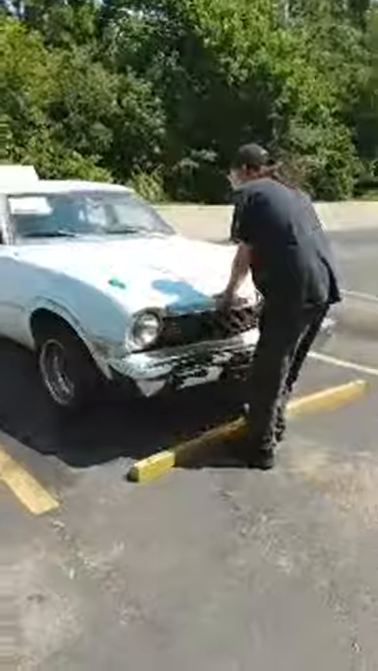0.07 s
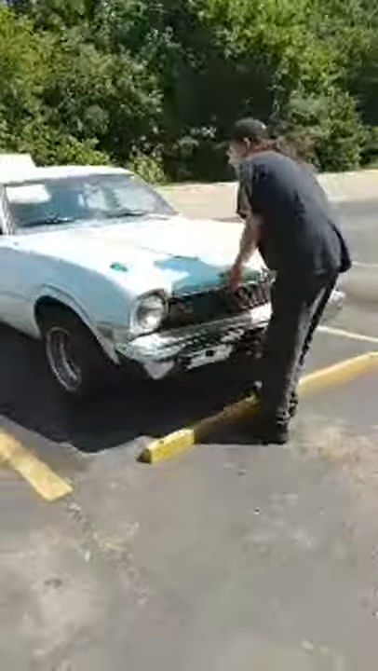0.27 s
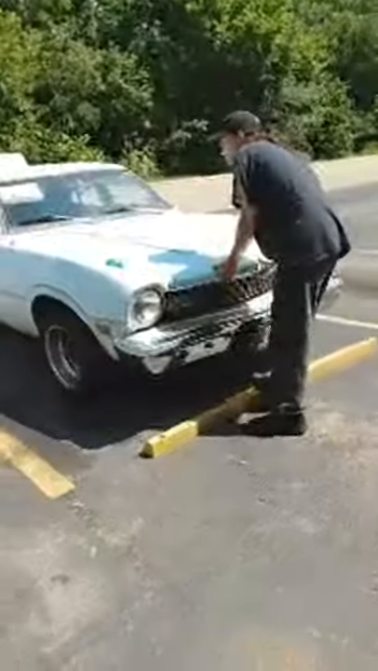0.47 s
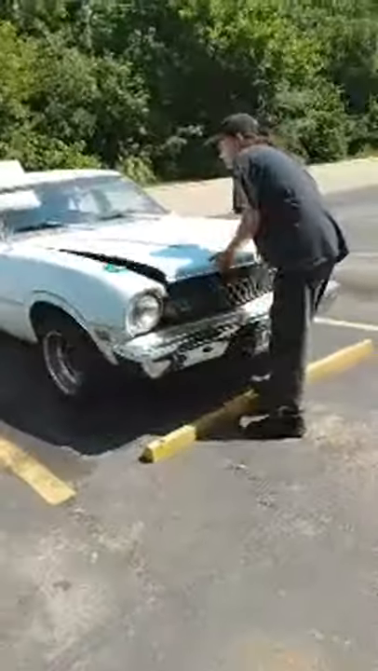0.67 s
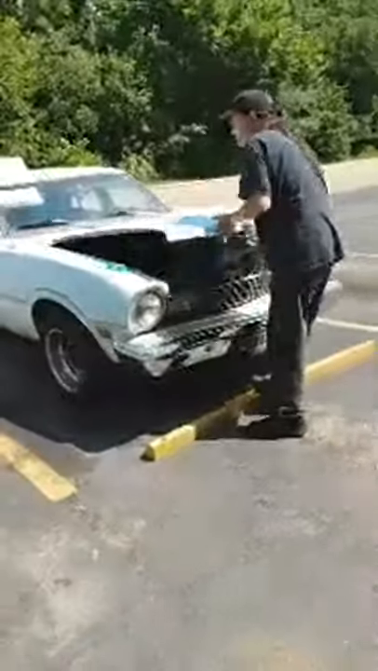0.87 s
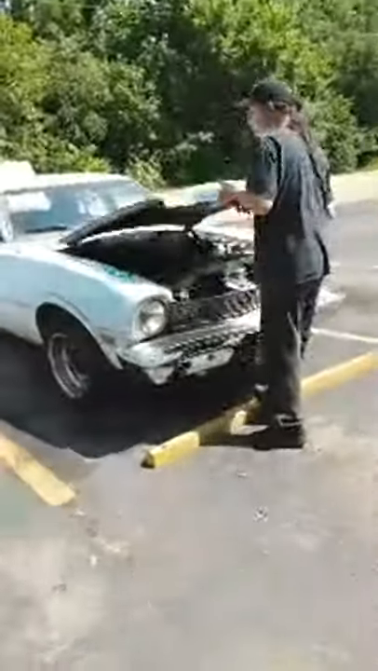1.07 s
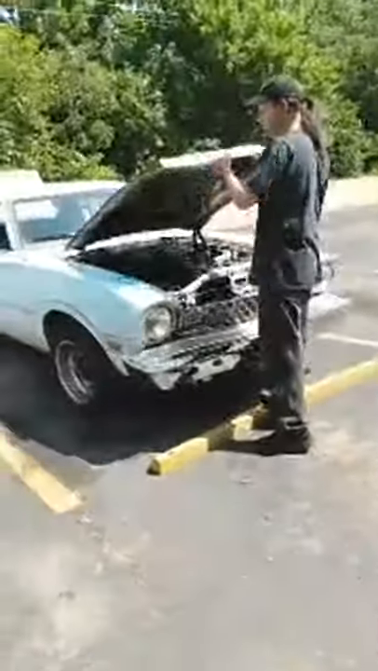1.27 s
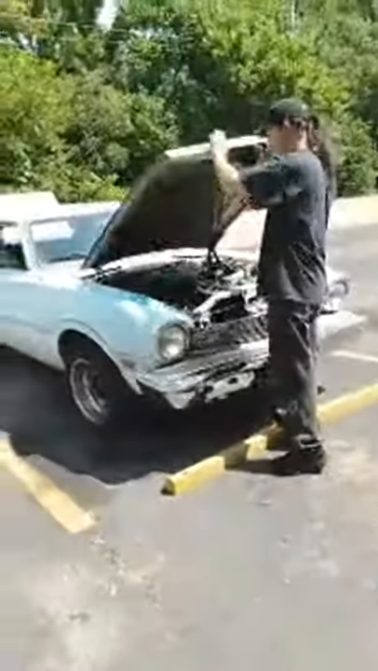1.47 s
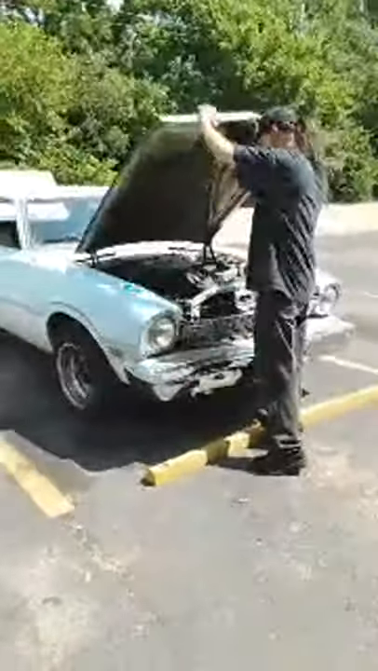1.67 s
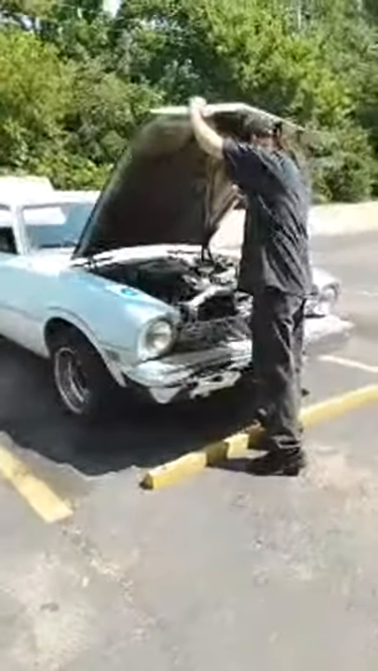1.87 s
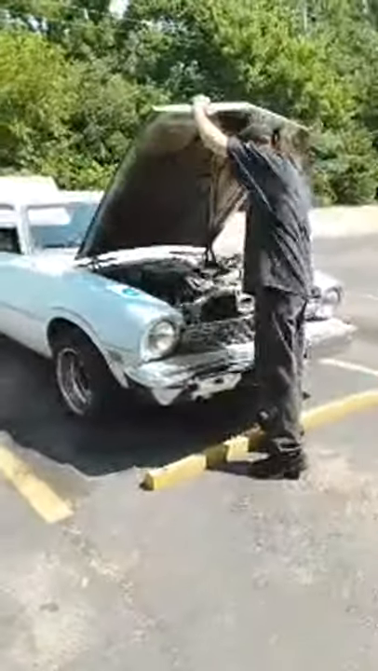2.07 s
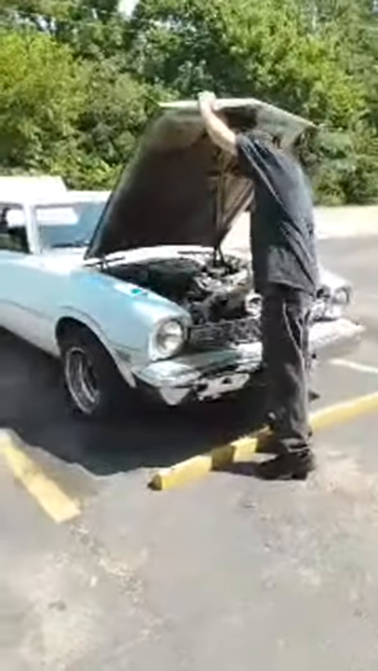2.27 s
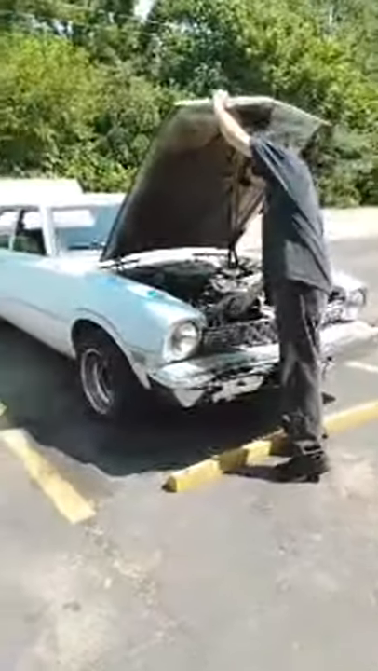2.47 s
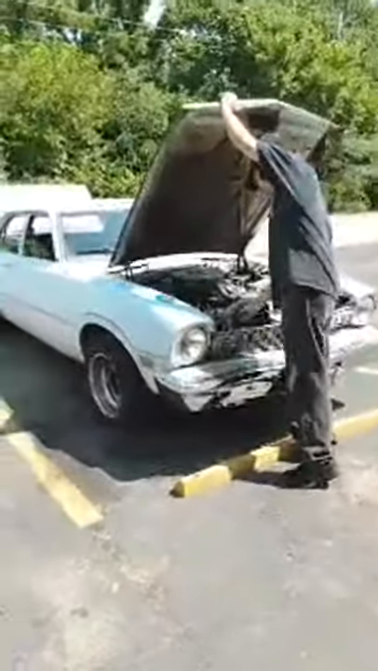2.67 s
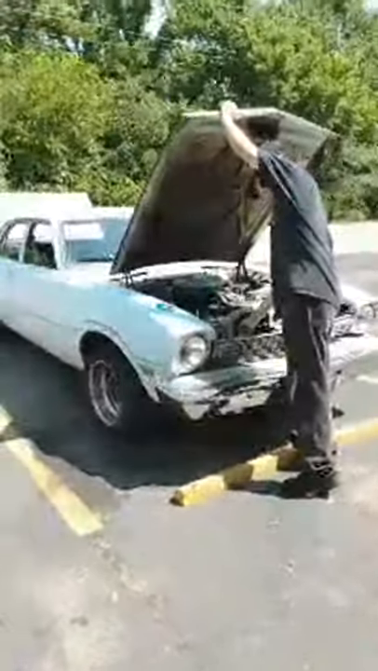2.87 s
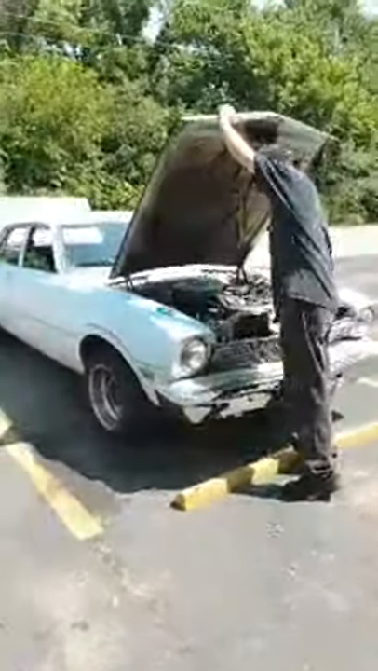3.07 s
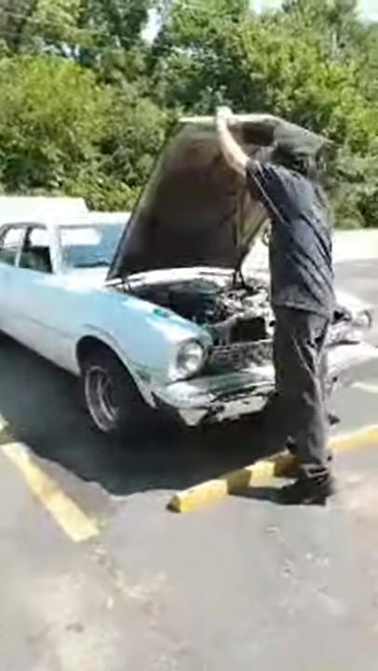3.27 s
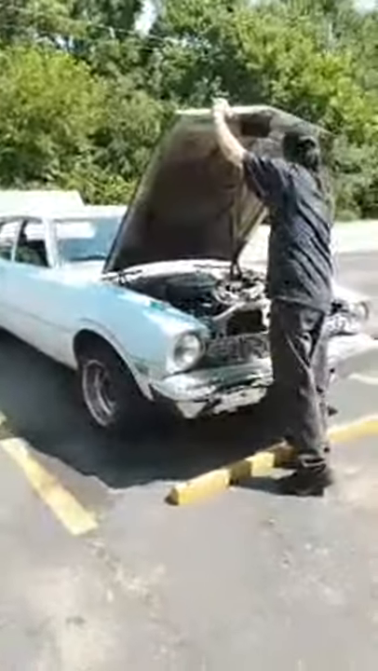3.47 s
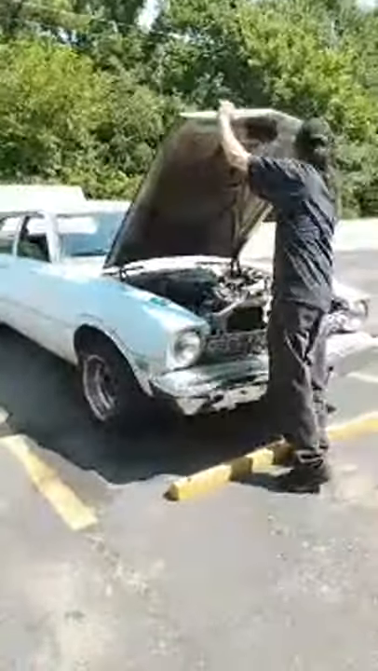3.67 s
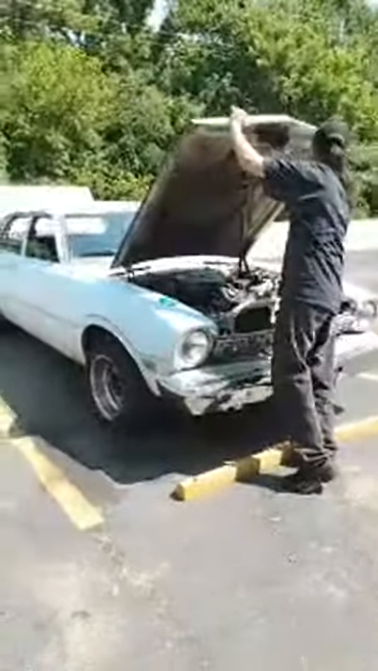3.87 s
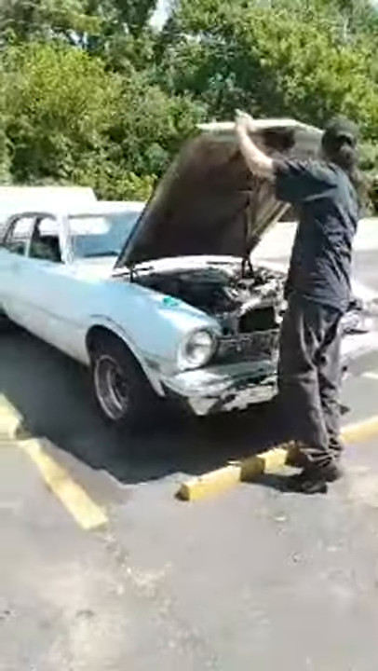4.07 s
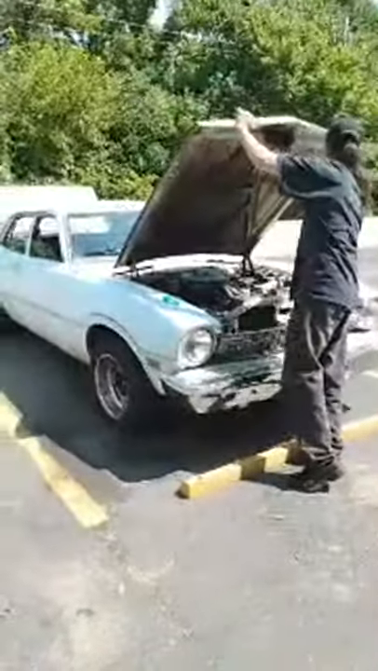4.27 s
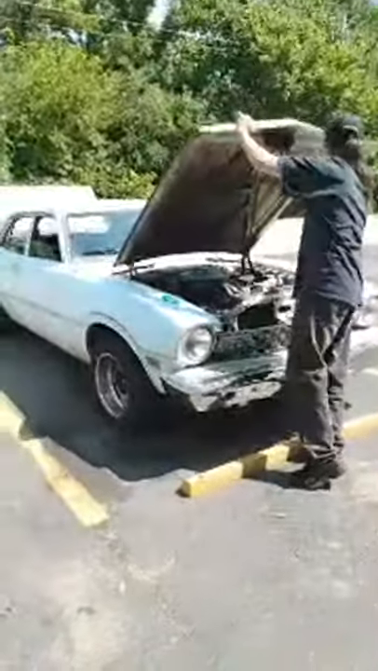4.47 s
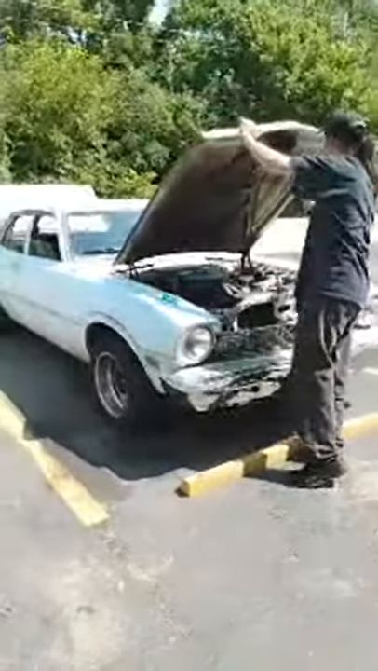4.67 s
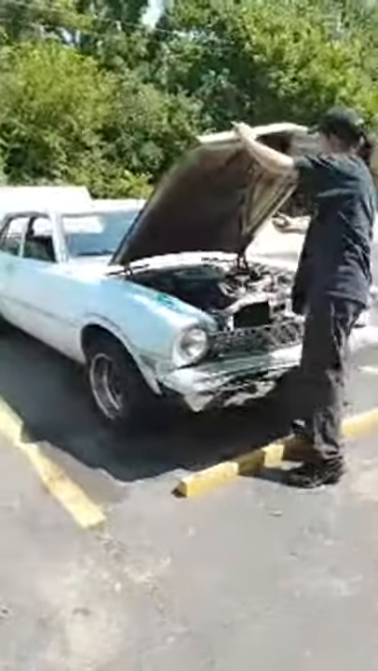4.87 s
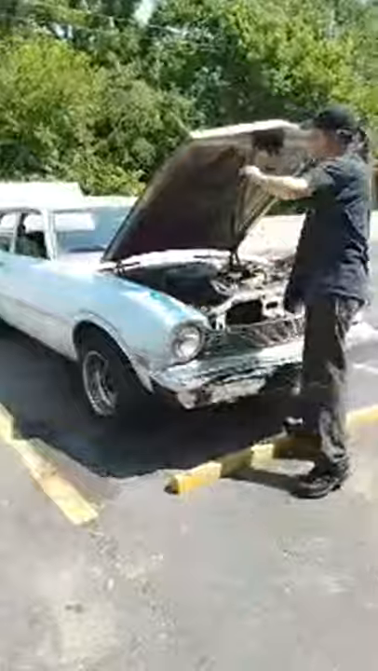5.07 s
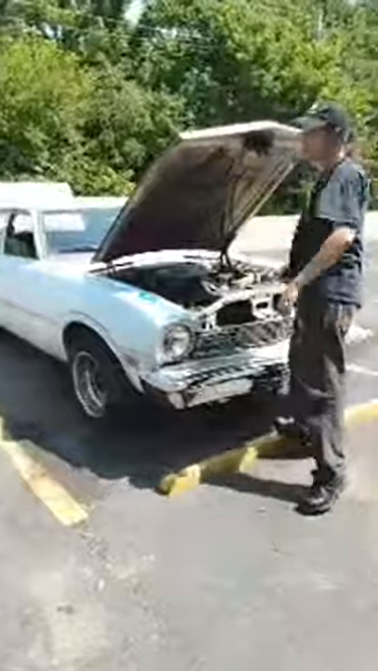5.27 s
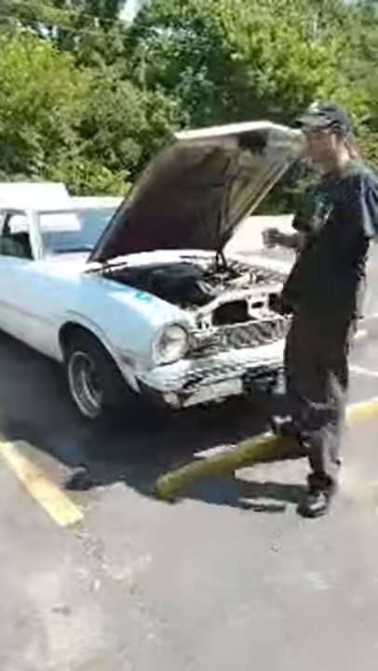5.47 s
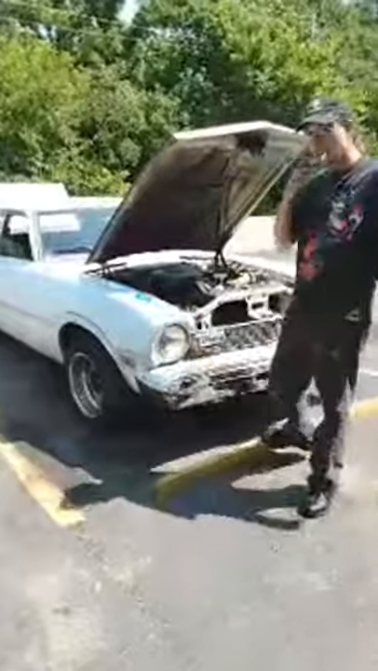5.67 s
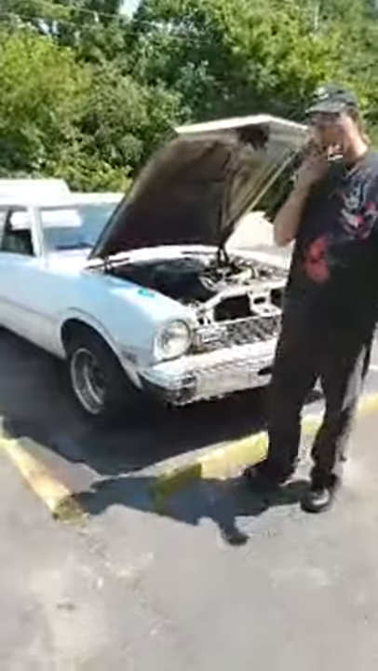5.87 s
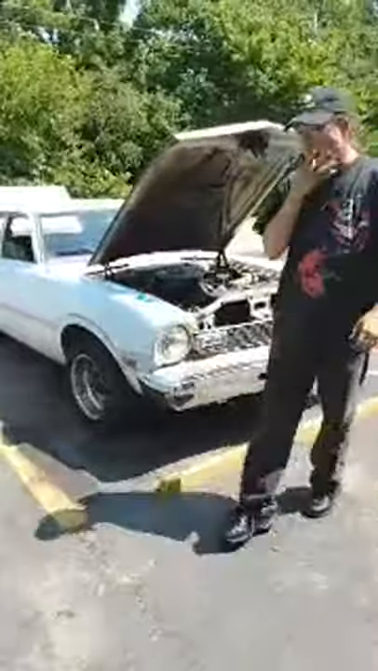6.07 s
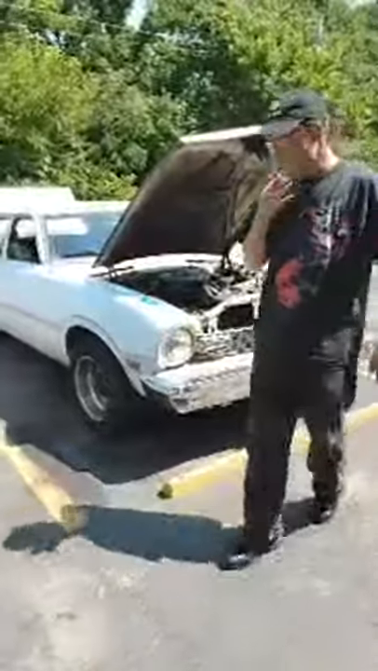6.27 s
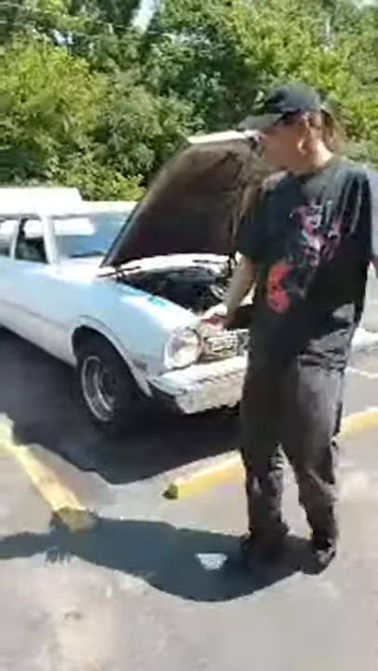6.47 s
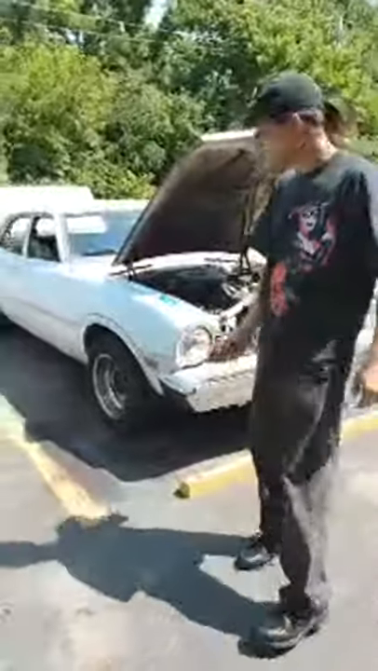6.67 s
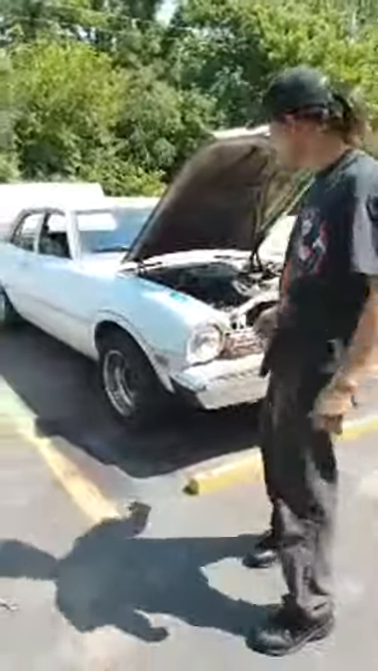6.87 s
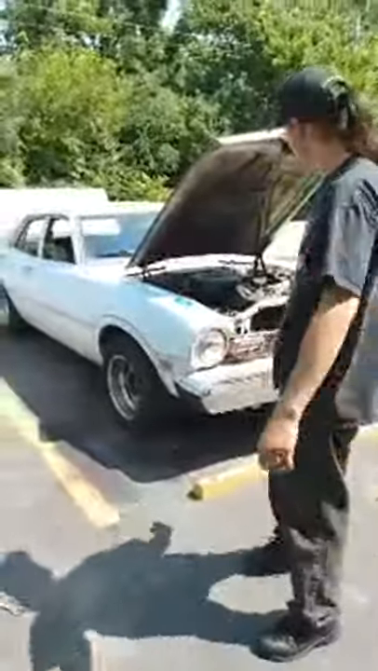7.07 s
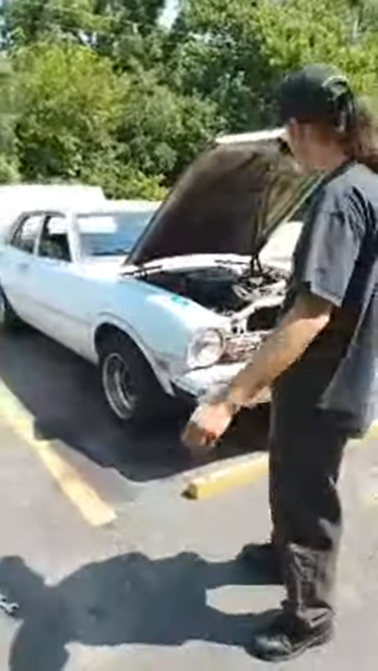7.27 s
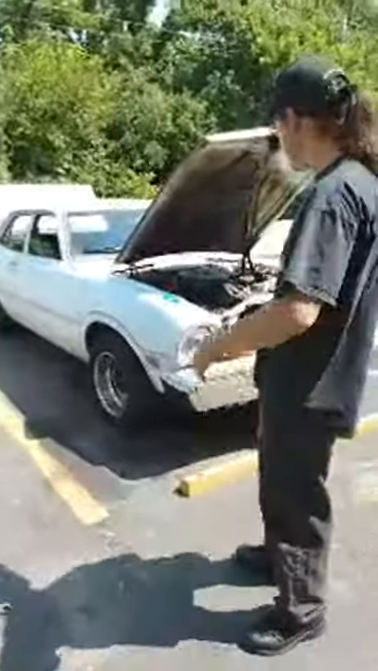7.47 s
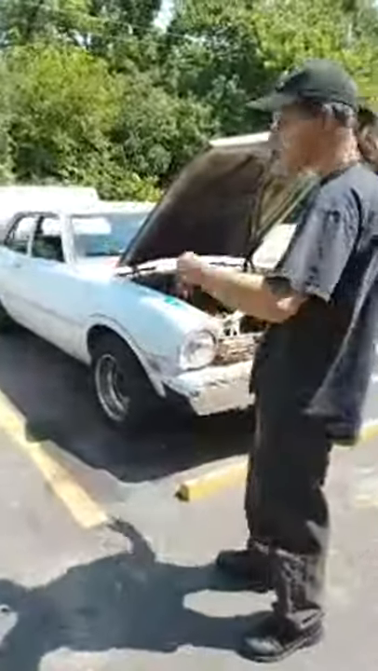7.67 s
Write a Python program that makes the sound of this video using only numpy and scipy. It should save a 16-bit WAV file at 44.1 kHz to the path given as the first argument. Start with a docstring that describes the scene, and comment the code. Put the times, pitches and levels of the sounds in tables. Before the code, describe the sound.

Outdoors in a quiet parking lot, a phone microphone a few metres away catches a car hood being opened. Small taps lead to a bright latch snap and a loud hollow clunk, a brief low hinge creak, then a pause. Rod clatter and knocks follow in clusters, ending with dull panel thumps. Quiet shoe scuffs on asphalt finish over faint, thin cicada buzz.

```python
"""Latch snaps and a deep clunk open the scene: a steel car hood is unlatched, lifted and propped in a quiet lot.
The hinge creaks, the rod knocks, and footsteps on asphalt gather towards the end; cicadas buzz in far trees.
Steel is ringing modes plus decaying noise bands, with wavering drones; the creak is stick-slip pulses through a body.
Shoes are coloured noise bursts; deep rumble, air puffs, hums, a brief hiss and a low floor are shaped noise.
A phone microphone listens."""
import sys
import numpy as np
from scipy import signal
from scipy.fft import rfft, irfft, next_fast_len
from scipy.io import wavfile
from scipy.ndimage import uniform_filter1d, map_coordinates

SR = 44100
rng = np.random.default_rng(int(sys.argv[2]) if len(sys.argv) > 2 else 0)


def linear_from_db(decibels):
    """Turn decibels (scalar or array-like) into linear amplitude factors; 0 gives 1."""
    return 10 ** (np.asarray(decibels, float) / 20)


def master_out(mix):
    """Clip the mix to full scale and print it as 16-bit PCM to the path in sys.argv[1]."""
    frames = np.transpose(np.atleast_2d(mix))
    ceiling = np.clip(frames, -1, 1)
    pcm = np.round(ceiling * 32767).astype(np.int16)
    wavfile.write(sys.argv[1], SR, pcm)


N = 340893  # length in samples

# All table levels are relative; sources add their own colour and random variation.
# Steel contacts: start_s, clank_db, boom_db, snap_db, pitch_hz (of the struck spot)
STEEL_CONTACTS = [(.004, -51, -53, -51, 433), (.04, -64.5, -56, -62, 1895), (.414, -40, -46, -69, 344),
                  (.44, -51, -50, -67.5, 463), (.535, -32, -40.5, -38.5, 230.7),
                  (.67, -49, -36, -47, 228.3), (0.679, -22.5, -32.5, -19.5, 3876),
                  (.795, -39.5, -33, -29, 5480), (.82, -33.5, -43, -28, 425),
                  (.888, -35.5, -27.5, -42, 219), (.942, -10, -12, -25.5, 461),
                  (1.052, -35.5, -24, -30, 370), (1.16, -44.5, -32, -46.5, 234),
                  (1.336, -48, -48, -62.5, 107), (1.408, -46.5, -44, -60.5, 325),
                  (1.5, -62, -47, -59.5, 107), (1.619, -48.5, -61.5, -75, 107),
                  (2.448, -39, -68, -75.5, 900), (2.463, -36.5, -57, -60.5, 425),
                  (2.484, -46.5, -66.5, -70, 1243), (2.521, -62, -50, -73, 348),
                  (2.587, -80, -66, -87, 224), (2.713, -37, -42.5, -62.5, 275),
                  (2.735, -27.5, -48, -32, 316), (2.831, -48.5, -38, -53, 900),
                  (2.847, -29.5, -36.5, -25, 252), (2.888, -26.5, -29, -19, 289),
                  (2.98, -21, -31.5, -19.5, 1692), (3.019, -47.5, -45.5, -45.5, 286),
                  (3.096, -51.5, -70.5, -43, 1380), (3.185, -55.5, -57, -38.5, 425),
                  (3.273, -46, -49, -26, 3860), (3.289, -57, -53, -47, 1068), (3.421, -54, -62, -49, 874),
                  (3.532, -42.5, -67.5, -28.5, 425), (3.573, -48, -85, -42, 1138),
                  (3.66, -54, -104, -58, 1100), (3.972, -45.5, -76, -39.5, 1150),
                  (3.982, -54, -89, -40, 1895), (4.107, -33, -34.5, -38, 391.7),
                  (4.358, -35.5, -47.5, -43, 2450), (4.462, -37.5, -51, -52, 370),
                  (4.506, -24.5, -31.5, -35, 333), (4.522, -29, -42, -35.5, 453),
                  (4.547, -57, -33.5, -50, 2450), (4.603, -39.5, -51, -44, 375),
                  (4.798, -31.5, -25, -50, 435), (4.93, -44.5, -35.5, -48.5, 268),
                  (5.048, -68, -44.5, -67, 237)]
# Centres of the steel zones clank, boom, ring, snap: centre_hz
STEEL_ZONES = [1300, 350, 4000, 11000]
# Strongest modes of the hood panel and its rod: mode_hz, level_db, t60_s
PANEL_MODES = [(107, -12, 1.3), (158.3, -9.5, 0.74), (163.4, -16, 1.5), (223, -1, 0.67), (252, -6.5, 0.58),
               (302, -6.5, 1), (325, -6, 0.51), (370, -4.5, 1), (425, 1.5, 0.35), (471.4, -8.5, 0.64),
               (555.8, -9.5, 0.93), (600, -2.5, 0.47), (690, -3, 0.32), (838, -9, 0.1), (900, -12, 0.25),
               (980, -7, 0.35), (1068, -3, .32), (1150, -1, 0.14), (1177, -15, 0.59), (1315.7, -14.5, .4),
               (1340, -12.5, 0.15), (1692, -4.5, 0.25), (1895, -6.5, .3), (2090, -12, 0.21),
               (2450, -6.5, 0.28), (3860, -9.5, 0.043), (5480, -1.5, 0.16), (8980, 0, 0.26),
               (9500, -5, 0.1567)]
# Dense field of small plate modes: band_hz, colour_db, early_t60_s, late_t60_s, late_db (t60s at length factor 1)
PLATE_FIELD = [(126.5, -18.5, 0.2, 1, -7.5), (235.3, -11, 0.26, 0.88, -12.5), (355, -8, 0.33, 0.69, -14),
               (556, -12.5, 0.33, 0.2, -6.5), (1080, -13.5, 0.37, 0.057, -9), (1712, -9, 0.16, 0.44, -10.5),
               (2830, -12, 0.15, 0.56, -15.5), (4627, -4, 0.11, 0.28, -16.5), (7080, -17, 0.18, 0.17, -6.5),
               (10100, -4.5, 0.11, .5, -17), (13800, 2, 0.021, 0.35, -15)]
# Single modes that drone on, wavering, until a hand or the rod damps them: start_s, length_s, mode_hz, level_db, t60_s
PANEL_DRONES = [(.95, 1.48, 107, -47.5, 4.8), (1.864, 0.32, 336, -68, 1), (2.98, .95, 107, -59.5, 6.7),
                (3.06, .13, 1380, -50, .8), (3.256, .08, 3860, -44, .4), (4.55, 0.71, 99.2, -51, 5.2),
                (4.807, 1.02, 327.5, -51, 2.3)]
# Hinge stick-slip over time: time_s, slips_per_s, level_db
HINGE_SLIPS = [(1.478, 52, -48), (1.517, 57, -35), (1.535, 120, -32.5), (1.555, 154, -28.5),
               (1.575, 193, -24), (1.59, 191, -32.5), (1.605, 90, -29.5), (1.625, 28, -32.5),
               (1.69, 38, -53)]
# Hinge body resonances: centre_hz, width_hz, level_db
HINGE_BODY = [(251, 68, 3.5), (490, 420, 1), (745, 650, -1.5), (1720, 1000, -57)]
# Shoes on asphalt: start_s, clap_db, thud_db, scuff_db, grit_db, length_factor
FOOTSTEPS = [(2.05, -68.5, -42, -98, -101, 0.23), (5.593, -89, -93.5, -68.5, -81, 0.75),
             (5.77, -101, -66.5, -91, -59, 0.95), (6.245, -86, -69, -70, -82, 0.93),
             (6.304, -58.5, -62, -55, -69, 0.87), (6.45, -90, -87, -88, -63, 0.88),
             (6.878, -48, -38.5, -75, -74, 0.41), (6.93, -58, -60, -88.5, -68, 0.82),
             (7.02, -51, -86, -77, -86, 0.56), (7.04, -90, -99, -65, -56, 3.2),
             (7.51, -76, -90.5, -81, -95, 1.02)]
# Centres of the shoe zones clap, thud, scuff, grit: centre_hz
SHOE_ZONES = [900, 350, 1900, 10500]
# Colour of a rubber sole: frequency_hz, gain_db
SOLE_COLOUR = [(600, 1.5), (780, -3), (900, 3.5), (1050, -1), (1350, -14), (1700, -12), (1880, 8),
               (2080, -5), (5000, 3.5)]
# Colour of the panel's deep wobble: frequency_hz, level_db_per_hz
WOBBLE_COLOUR = [(15, -47.5), (25, -23), (50, -19), (86, 4.5), (161, 0.5), (194, -21.5), (220, -28.5),
                 (290, -54.5), (480, -120)]
# Puffs of air on the microphone: middle_s, spread_s (either side), level_db
AIR_PUFFS = [(0.073, 0.091, -51), (0.357, 0.12, -69.5), (1.094, 0.2, -48), (1.583, .08, -51.5),
             (4.222, 0.11, -41.5), (4.863, 0.051, -36.5), (5.195, 0.055, -59), (5.77, .06, -63),
             (6.337, 0.083, -52), (6.68, 0.23, -67.5), (7.001, 0.14, -70.5), (7.676, 0.12, -74)]
# Colour of the moving air: frequency_hz, level_db_per_hz
AIR_COLOUR = [(15, -56), (30, -27), (45, -11.5), (65, -3.5), (90, -3.5), (130, -10.5), (190, -26),
              (300, -60), (480, -120)]
# Cicada loudness over time: time_s, level_db
CICADA_LEVEL = [(0, -70.5), (.5, -107), (1.2, -63), (1.68, -68), (2.28, -68), (2.7, -60), (3.66, -61),
                (4.6, -55), (5.25, -59.5), (6.8, -60), (7.73, -64)]
# Colour of the cicada chorus: frequency_hz, level_db_per_hz
CICADA_COLOUR = [(1120, -58.5), (1900, -29.5), (2300, -36), (2370, -25.5), (2780, -1.5), (3010, -6),
                 (3900, -2), (4650, -7.5), (6020, 1), (6650, -6.5), (7750, -34), (8830, -22), (9310, -20),
                 (10100, -36), (11800, -28), (15300, -52.5), (22000, -120)]
# Faint flickering hums, perhaps single insects: centre_hz, spread_hz (either side), level_db
INSECT_HUMS = [(2440, 170, -85), (8300, 64, -89), (9100, 70, -88.5)]
# Colour of distant traffic and microphone noise: frequency_hz, level_db_per_hz
FLOOR_COLOUR = [(60, -9.5), (300, 12), (600, -0.5), (2000, 0), (16000, -4)]

TIME_S = np.arange(N) / SR


def unit(x):
    """Scales a signal to rms 1."""
    return x / np.sqrt(np.mean(x ** 2, axis=-1, keepdims=True) + 1e-20)


def along(points, hz):
    """Reads (Hz, value) points on a log frequency axis."""
    f, v = np.transpose(sorted(points))
    return np.interp(np.log(hz + 1), np.log(f + 1), v)


def curves(rows):
    """Draws one value per sample for each column after the time."""
    s, *columns = np.transpose(rows)
    return [np.interp(TIME_S, s, column) for column in columns]


def wobble(rate):
    """Draws a smooth random curve with rate knots a second."""
    knots = rng.standard_normal(int(N * rate / SR) + 4)
    return map_coordinates(knots, [np.arange(N) * rate / SR])


def filtered(x, response):
    """Multiplies the spectrum of x by a complex response of frequency."""
    m = next_fast_len(N + SR // 2)
    return irfft(rfft(x, m) * response(np.fft.rfftfreq(m, 1 / SR)), m)[..., :N]


def coloured(x, points):
    """Filters x with a gain curve of (Hz, dB) points."""
    return filtered(x, lambda hz: linear_from_db(along(points, hz)))


def gate(start_s, end_s, fade_s):
    """Opens between two times with straight fades inside them."""
    return np.clip(np.minimum(TIME_S - start_s, end_s - TIME_S) / fade_s, 0, 1)


def patchy(spectrum, patchy_db):
    """Coloured noise of rms 1 whose time-frequency patches have random gain."""
    z = signal.stft(rng.standard_normal(N + 512), nperseg=256)[2]
    field = uniform_filter1d(rng.standard_normal(z.shape), 3, 0)
    field = uniform_filter1d(field, 6, 1)
    noise = signal.istft(z * linear_from_db(patchy_db * field / field.std()), nperseg=256)[1][:N]
    return unit(coloured(noise, spectrum))


def blows():
    """Contacts, plus fading rebounds after hard blows: start_s, clank_db, boom_db, ring_db, snap_db, pitch_hz."""
    hard_boom_db, rebound_s = -27.5, 0.037
    loss_db = np.array([7, 8, 5.5])  # lost at each rebound in clank, boom, snap
    modes_hz = np.transpose(PANEL_MODES)[0]
    low_modes_hz = modes_hz[modes_hz < 500]
    rebounds = []
    for s, *zones_db, _ in STEEL_CONTACTS:
        if zones_db[1] > hard_boom_db:
            for k in range(1, 5):
                faded_db = np.array(zones_db) - k * loss_db
                rebounds.append((s + k * rebound_s, *faded_db, rng.choice(low_modes_hz)))
    s, clank, boom, snap, pitch = np.transpose(STEEL_CONTACTS + rebounds)
    # the ring lies a little above the weaker of clank and snap
    ring = np.minimum(clank, snap) + 0.25 * np.abs(clank - snap) + 2
    return np.transpose([s, clank, boom, ring, snap, pitch])


def ringing(hits):
    """Contacts ring the strong modes at new strengths; the mode nearest the struck spot's pitch sings out."""
    hz, mode_db, t60 = np.transpose(PANEL_MODES)[:, :, None]
    t, out = np.arange(SR) / SR, np.zeros(N + SR)
    luck = rng.standard_normal((len(hits), 2, len(PANEL_MODES), 1))
    # neighbouring small modes blur each line: its phase wanders, more so for high modes
    drift = uniform_filter1d(rng.standard_normal((len(PANEL_MODES), SR)), size=150)
    wander = np.cumsum(drift, axis=1) * np.sqrt(0.11 * hz / SR)
    onset = 1 - np.exp(-t * hz / 0.4)
    fade = np.cos(np.pi * t / 2) * linear_from_db(-60 * t / t60)  # the cosine reaches silence after 1 s
    swing = np.exp(2j * np.pi * hz * t + 1j * wander) * onset * fade
    for (s, *zones_db, pitch_hz), (scatter, phase) in zip(hits, luck):
        zones = list(zip(STEEL_ZONES, zones_db))
        clean_db = 6.5 - 0.27 * max(zones_db)  # light taps pick out one mode, hard blows shake them all
        favour_db = clean_db * np.exp(-(np.log(hz / pitch_hz) / 0.06) ** 2)
        level = linear_from_db(mode_db + along(zones, hz) + favour_db + 3.3 * scatter)
        start = round(s * SR)
        out[start:start + SR] += ((level * np.exp(3j * phase))[:, 0] @ swing).imag
        # the spot itself gives a short ping: a few close small modes
        ping_db = along(zones, pitch_hz) + clean_db - 8 - 60 * t / 0.14
        close_hz = pitch_hz * (1 + 0.039 * scatter[:3])
        close = np.sin(2 * np.pi * close_hz * t + 3 * phase[:3])
        out[start:start + SR] += linear_from_db(ping_db) * (1 - np.exp(-t / 0.0018)) * close.sum(axis=0)
    return linear_from_db(-12.0) * out[:N]


def bursts(events, zones_hz, lengths, rises_s, late_share, rattle_db):
    """Blows fill overlapping noise bands that die fast, then slowly; loose parts make them rattle."""
    hz, colour_db, early, late, late_db = np.transpose(PLATE_FIELD)[:, :, None]
    t, power = np.arange(SR) / SR, np.zeros((len(PLATE_FIELD), N + SR))
    for (s, *zones_db, _), length, rise_s in zip(events, lengths, rises_s):
        level = linear_from_db(colour_db + along(list(zip(zones_hz, zones_db)), hz))
        rise = 1 - np.exp(-t / (rise_s + 1 / hz))  # low bands take longer to build up
        early_decay = linear_from_db(-60 * t / (early * length))
        late_decay = late_share * linear_from_db(late_db - 60 * t / (late * length))
        start = round(s * SR)
        power[:, start:start + SR] += (level * rise * (early_decay + late_decay)) ** 2

    def crossfades(f):
        centres = np.log(hz[:, 0])
        shares = [np.interp(np.log(f + 1), centres, row) for row in np.eye(len(hz))]
        return np.sqrt(shares) * (f > 80)

    bands = unit(filtered(patchy([(1, 0)], patchy_db=2.0), crossfades))
    rattle = linear_from_db(rattle_db * (wobble(120) + np.array([wobble(45) for _ in hz])))
    return np.sum(bands * rattle * np.sqrt(power[:, :N]), axis=0)


def drones():
    """Single modes outlast the rest, each a narrow wavering band."""
    out = np.zeros(N)
    for s, length, hz, db, t60 in PANEL_DRONES:
        level = linear_from_db(db - 60 * np.abs(TIME_S - s) / t60 + 4 * wobble(4.5))
        tone = np.sin(2 * np.pi * hz * TIME_S + 1.6 * wobble(24))
        out += level * gate(s, s + length, 0.061) * tone
    return out


def steel():
    """Struck hood and rod: noisy plate field, ringing modes and drones."""
    hits = blows()
    lengths = linear_from_db(0.077 * (hits[:, 2] + 51))  # the more a blow moves the whole panel, the longer it sounds
    rises_s = np.full(len(hits), 0.0028)
    field = bursts(hits, STEEL_ZONES, lengths, rises_s, late_share=0.69, rattle_db=-0.85)
    return field + ringing(hits) + drones()


def creak():
    """The hinge sticks and slips unevenly; each slip pushes the panel with a puff of grit behind it."""
    rate, level_db = curves(HINGE_SLIPS)
    active = (TIME_S > HINGE_SLIPS[0][0]) & (TIME_S < HINGE_SLIPS[-1][0])
    slips = np.flatnonzero(np.diff(np.floor(np.cumsum(rate * active) / SR)))
    luck = rng.standard_normal((len(slips), 2))
    jitter = np.int_(0.04 * SR / rate[slips] * luck[:, 0])
    pushes = np.zeros(N)
    pushes[slips + jitter] = linear_from_db(level_db[slips] + 1.2 * luck[:, 1])
    grit_tail = linear_from_db(-31 - 60 * TIME_S[:2000] / 0.02)
    grit = signal.fftconvolve(pushes, grit_tail)[:N] * rng.standard_normal(N)

    def body(f):
        total = 0
        for k, (centre, width, db) in enumerate(HINGE_BODY):
            resonance = 1j * f * width / (centre * centre - f * f + 1j * f * width)
            total = total + (-1) ** k * linear_from_db(db) * resonance  # neighbours in opposite phase
        return total / (1 + 1j * f / 1150) ** 2  # the treble softens

    return linear_from_db(35.5) * filtered(pushes + grit, body)


def footsteps():
    """Soles clap, thud, scuff and grind on asphalt as noise bursts coloured by rubber."""
    lengths = np.transpose(FOOTSTEPS)[-1]
    rises_s = 0.0038 * lengths ** 3  # long scuffs swell slowly
    contact = bursts(FOOTSTEPS, SHOE_ZONES, lengths, rises_s, late_share=0.53, rattle_db=4.0)
    return coloured(contact, SOLE_COLOUR)


def lumpy(colour):
    """Deep coloured noise of rms 1 with an uneven level."""
    noise = coloured(rng.standard_normal(N), colour)
    return unit(linear_from_db(1.5 * wobble(12)) * noise)


def panel_wobble():
    """Every contact sets the panel wobbling deep down, swelling and then dying away."""
    swell_s, t60_s = 0.051, 0.7
    power = np.zeros(N)
    for s, _, boom_db, *_ in STEEL_CONTACTS:
        age = np.clip(TIME_S - s, 0, None)
        level = linear_from_db(-28.5 + 0.75 * boom_db - 60 * age / t60_s)
        power += (level * (1 - np.exp(-age / swell_s))) ** 2
    return np.sqrt(power) * lumpy(WOBBLE_COLOUR)


def air_puffs():
    """Puffs of air press on the microphone over a faint still-air rumble."""
    power = np.full(N, linear_from_db(-79) ** 2)
    for middle_s, spread_s, db in AIR_PUFFS:
        power += (linear_from_db(db) * np.exp(-((TIME_S - middle_s) / spread_s) ** 2)) ** 2
    return np.sqrt(power) * lumpy(AIR_COLOUR)


def cicadas():
    """A far chorus throbs as patchy coloured noise under slow and fast random gain."""
    throb_db = 1.1 * wobble(9) + 0.43 * wobble(160)
    chorus = unit(linear_from_db(throb_db) * patchy(CICADA_COLOUR, patchy_db=2.5))
    return linear_from_db(curves(CICADA_LEVEL)[0]) * chorus


def hums():
    """Narrow noise bands flicker in level."""
    out = np.zeros(N)
    for hz, spread_hz, db in INSECT_HUMS:
        band = filtered(rng.standard_normal(N), lambda f: np.exp(-((f - hz) / spread_hz) ** 2))
        out += linear_from_db(db + 3.0 * wobble(6.3)) * unit(band)
    return out


def hiss():
    """A thin hiss of noise above 12 kHz comes and goes once."""
    noise = unit(filtered(rng.standard_normal(N), lambda hz: hz > 12050))
    return linear_from_db(-67) * gate(4.17, 6.48, 0.025) * noise


def noise_floor():
    """Distant traffic and microphone noise blend into low patchy noise."""
    return linear_from_db(-83) * patchy(FLOOR_COLOUR, patchy_db=-0.5)


def scene():
    """Mixes hood, hinge, shoes, deep rumble and the lot into one channel."""
    near = steel() + creak() + footsteps()
    rumble = panel_wobble() + air_puffs()
    background = cicadas() + hums() + hiss() + noise_floor()
    return (near + rumble + background)[None]


def top_cut(x):
    """Nothing passes above the cut-off."""
    return signal.sosfilt(signal.butter(12, 16990, fs=SR, output="sos"), x)


def record(dry):
    """The phone drops the deepest bass and keeps little above its band limit."""
    top_hz, bass_hz = 15800, 45

    def band(hz):
        treble = np.clip((top_hz + 100 - hz) / 200, linear_from_db(-30.5), 1)
        bass = (1j * hz / (bass_hz + 1j * hz)) ** 2
        return treble * bass

    return top_cut(filtered(dry, band))


dry = scene()
out = record(dry)
master_out(out)
```